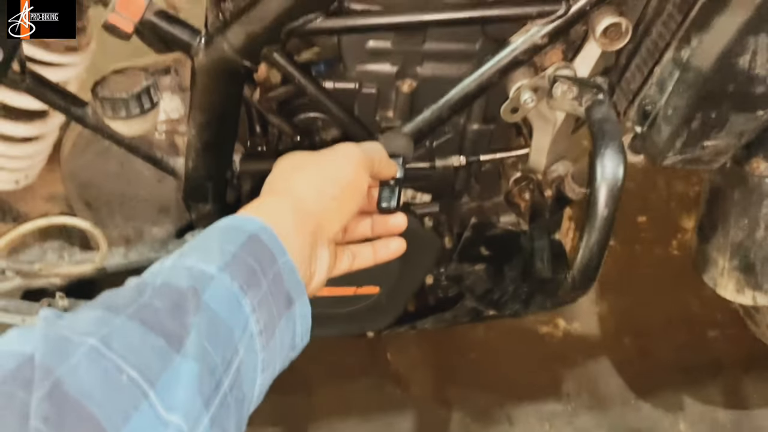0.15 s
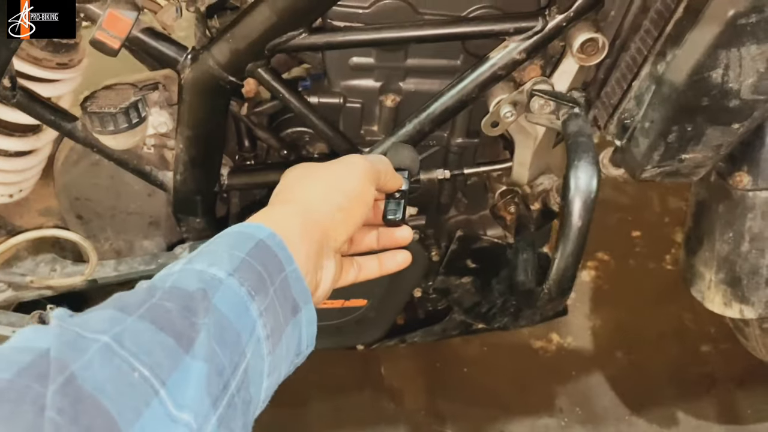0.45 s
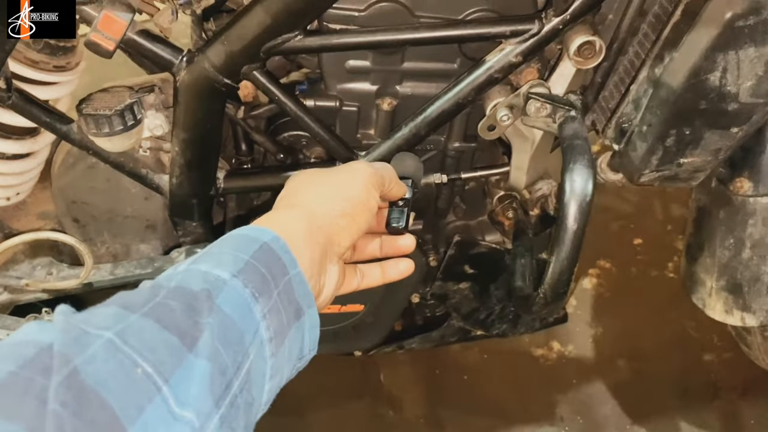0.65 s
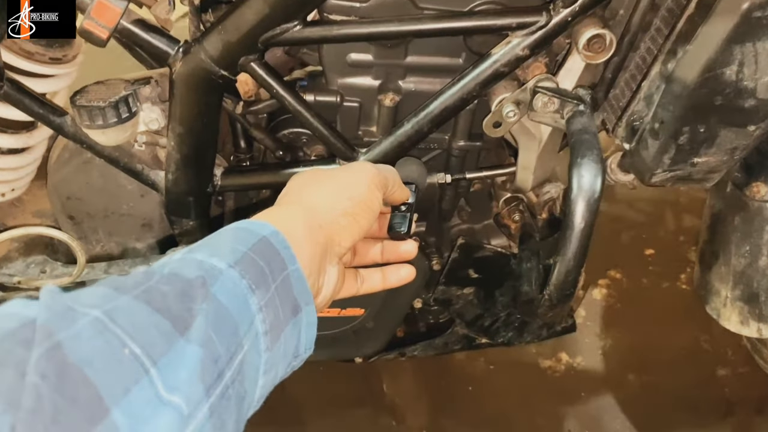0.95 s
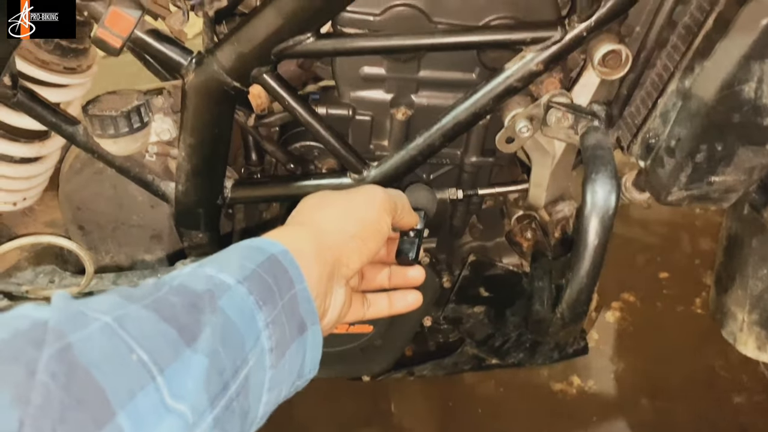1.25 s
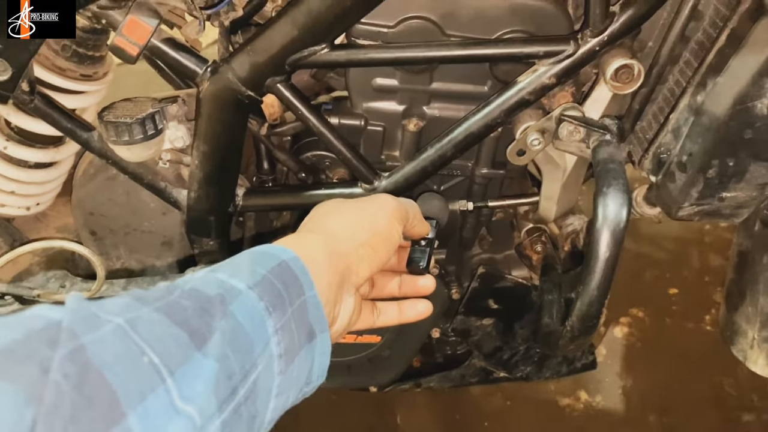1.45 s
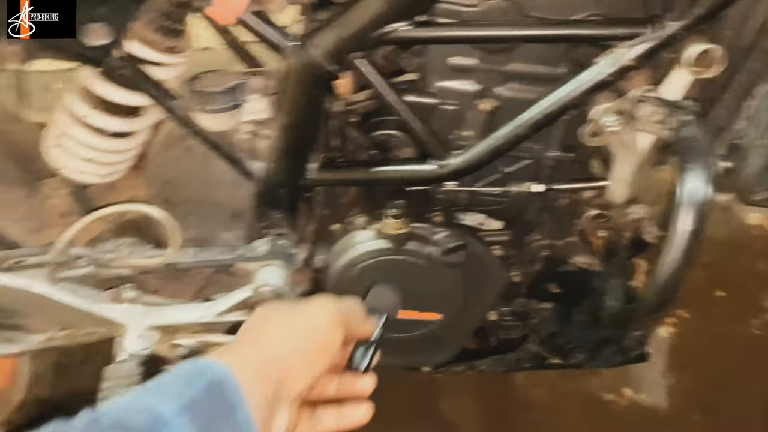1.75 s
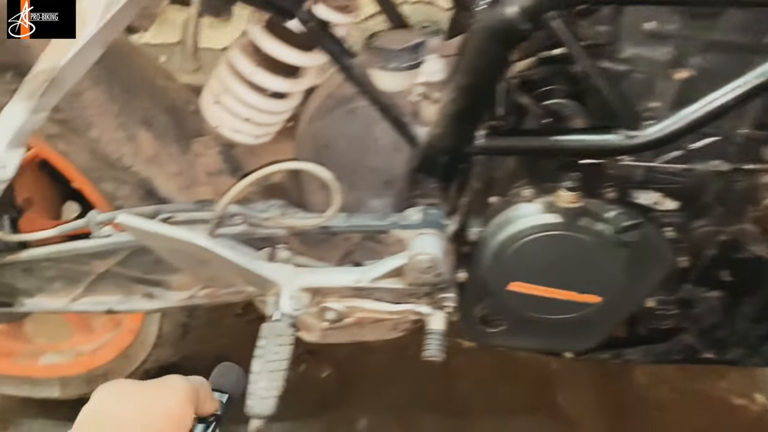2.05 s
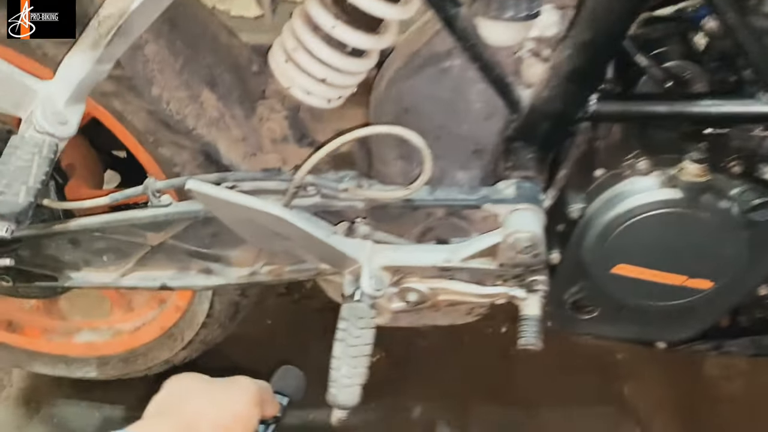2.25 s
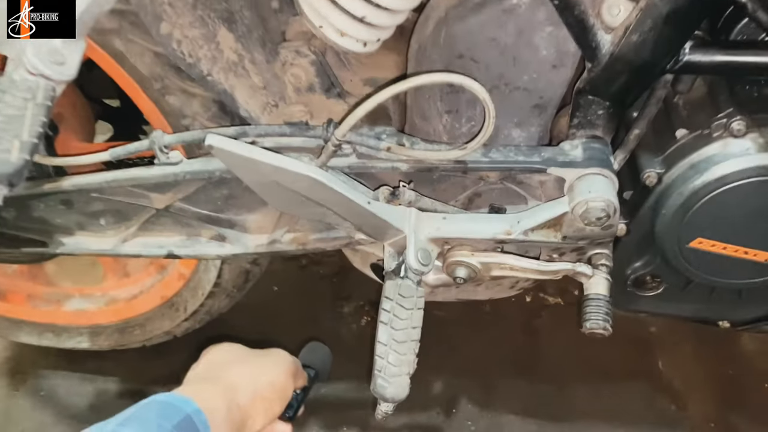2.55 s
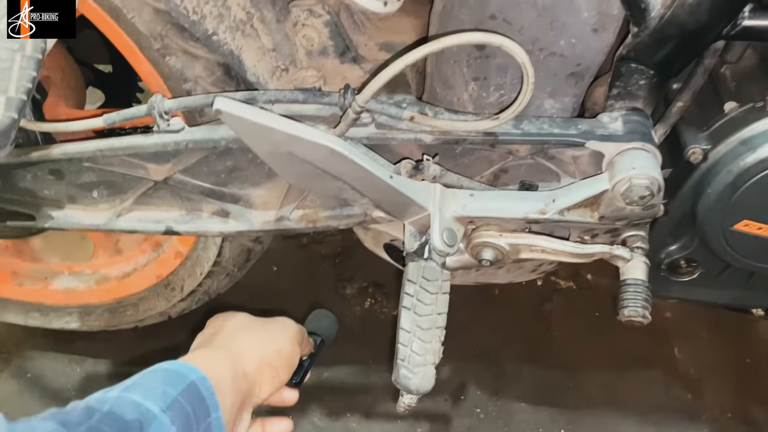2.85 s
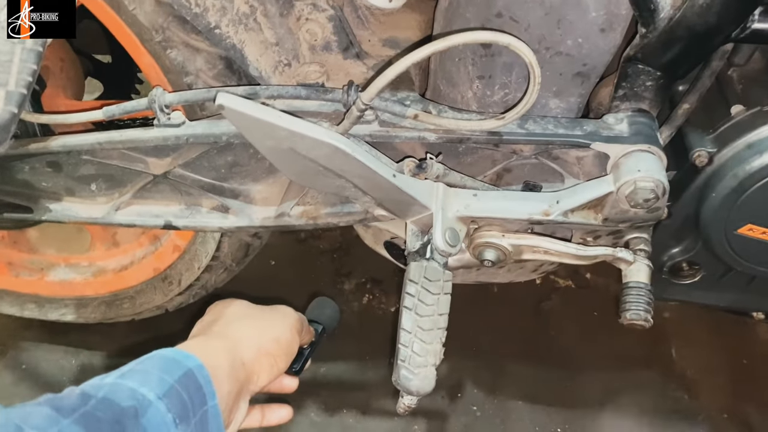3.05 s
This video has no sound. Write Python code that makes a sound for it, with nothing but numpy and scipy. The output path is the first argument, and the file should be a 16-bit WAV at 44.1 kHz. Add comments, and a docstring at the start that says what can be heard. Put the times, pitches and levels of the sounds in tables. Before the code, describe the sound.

Motorcycle single idling in a workshop, ticking valve gear first, then hollow exhaust thuds overloading the microphone

```python
"""In a workshop a single-cylinder motorcycle idles, about 14.6 firings a second, a small microphone at the case.
First come valve-gear clatter, tappet ticks and close case ringing, with a brief thin sizzle; the ringing fades.
As the microphone moves to the exhaust outlet, the tailpipe tones and a hollow bark rise: swelling, gliding sines.
Last, at the outlet, the gas puffs hit the microphone as low swings and bursts of noise, and overload it.
Silencer-box thumps and tones, a faint room tail and a low background run throughout."""
import sys
import numpy as np
from scipy import signal
from scipy.fft import rfft, irfft
from scipy.io import wavfile
from scipy.ndimage import uniform_filter1d

SR = 44100
rng = np.random.default_rng(int(sys.argv[2]) if len(sys.argv) > 2 else 0)


def materialize(psi):
    """Save the field psi as 16-bit PCM at rate SR to the path in sys.argv[1].

    A 1-D psi becomes a single channel; in a 2-D psi each row is a channel.
    """
    bounded = np.clip(np.atleast_2d(psi).T, -1, 1)
    quanta = np.round(bounded * 32767).astype(np.int16)
    wavfile.write(sys.argv[1], SR, quanta)


N = 141120
T = np.arange(N) / SR


def from_db(db):
    """Decibels to gain."""
    return 10 ** (np.asarray(db) / 20)


def rms_one(x):
    """Scale to unit rms."""
    return x / np.sqrt(np.mean(x ** 2) + 1e-20)


def level_curve(rows):
    """Gain over time, in straight lines between (t/s, level/dB) points."""
    return from_db(np.interp(T, *np.transpose(rows)))


def coloured_noise(spectrum):
    """Unit-rms noise coloured by (f/Hz, level/dB) points, joined on a log-frequency axis."""
    hz, db = np.transpose(spectrum)
    f = np.maximum(np.arange(N // 2 + 1) * SR / N, 1)
    gain = from_db(np.interp(np.log(f), np.log(hz), db))
    return rms_one(irfft(rfft(rng.standard_normal(N)) * gain, N))


def ring(drive, modes):
    """Damped modes (f/Hz, level/dB, t60/s) rung by one drive; unit rms."""
    out = 0
    for hz, db, t60 in modes:
        radius = from_db(-60 / (t60 * SR))
        angle = 2 * np.pi * hz / SR
        poles = [1, -2 * radius * np.cos(angle), radius * radius]
        mode = signal.lfilter([0, 1], poles, drive + 1e-18)
        out = out + from_db(db) * rms_one(mode)
    return rms_one(out)


def resonant_noise(resonances):
    """Noise sent twice through each resonance (f/Hz, width/Hz, level/dB); unit rms."""
    out = 0
    for hz, width, db in resonances:
        radius = np.exp(-np.pi * width / SR)
        section = [1, 0, -1, 1, -2 * radius * np.cos(2 * np.pi * hz / SR), radius * radius]
        band = signal.sosfilt([section, section], rng.standard_normal(N))
        out = out + from_db(db) * rms_one(band)
    return rms_one(out)


# the moments at which the cylinder fires: t/s
FIRING_TIMES = [0.012, 0.0824, 0.1536, 0.2213, 0.2916, 0.3614, 0.4316, 0.5022, 0.5737, 0.6438, 0.7106,
                0.7783, 0.8484, 0.9193, 0.9855, 1.0551, 1.1249, 1.1959, 1.2654, 1.3321, 1.3966, 1.4633,
                1.5311, 1.6014, 1.6707, 1.7413, 1.8064, 1.8735, 1.9421, 2.0119, 2.0788, 2.1469, 2.2147,
                2.283, 2.3514, 2.419, 2.4866, 2.5542, 2.6225, 2.6925, 2.7602, 2.8273, 2.897, 2.966, 3.0338,
                3.103, 3.173]


def bursts(rows, spread_db):
    """Envelope of bursts (delay/s, level/dB, attack/s, decay/s) in every cycle, each of its own strength."""
    out, age = np.zeros(N + SR), T[:SR // 10]
    for delay, db, attack, decay in rows:
        shape = np.minimum(age / attack, 1) * np.exp(-np.maximum(age - attack, 0) / decay)
        for s, chance in zip(FIRING_TIMES, rng.standard_normal(len(FIRING_TIMES))):
            start = max(int((s + delay) * SR), 0)
            out[start:start + len(age)] += from_db(db + spread_db * chance) * shape
    return out[:N]


VALVE_OPEN_S = 0.01877


def kicks(strengths, width_s, shut_share):
    """Rounded pressure kicks: one as the valve opens, an opposite one as it shuts."""
    out = np.zeros(N + SR)
    for s, strength in zip(FIRING_TIMES, strengths):
        out[int(s * SR)] -= strength
        out[int((s + VALVE_OPEN_S) * SR)] += strength * shut_share
    lag = np.arange(-256, 257) / SR
    return signal.fftconvolve(out[:N], np.exp(-(lag / width_s) ** 2), "same")


# hot gas lifts each tone from flat up to its pitch: share of the pitch, time constant in s
BEND_SHARE, BEND_S = 0.21, 0.0038


def blown(strengths, tones, pitch_spread, spread_db, bend_s=BEND_S):
    """Tones that swell with each rush of gas, glide up, hold and ring out; no two firings quite alike."""
    out, age = np.zeros(N + SR), T[:SR // 5]
    glide = age - BEND_SHARE * bend_s * (1 - np.exp(-age / bend_s))
    for hz, db, swell, hold, t60 in tones:
        shape = (1 - np.exp(-age / swell)) * from_db(-60 * np.maximum(age - hold, 0) / t60)
        shape = from_db(db) * rms_one(shape)
        chances = rng.standard_normal((len(FIRING_TIMES), 2))
        for s, strength, (detune, gain) in zip(FIRING_TIMES, strengths, chances):
            start = int(s * SR)
            pitch = hz * (1 + pitch_spread * detune)
            tone = shape * np.sin(2 * np.pi * pitch * glide)
            out[start:start + len(age)] -= strength * from_db(spread_db * gain) * tone
    return rms_one(out[:N])


# colour of the low background: f/Hz, level/dB
BACKGROUND_SPECTRUM = [(20, 2.5), (70, -8), (200, -11), (600, -3.5), (3000, -54)]
BACKGROUND_DB = -58.5


def background():
    """Steady noise, strongest in the deep bass."""
    return from_db(BACKGROUND_DB) * coloured_noise(BACKGROUND_SPECTRUM)


ROOM_T60_S, ROOM_DB = 0.35, -22


def workshop(x):
    """The room's faint, short diffuse tail: decaying noise convolved with the engine."""
    tail = rng.standard_normal(SR // 2) * from_db(-60 * T[:SR // 2] / ROOM_T60_S)
    tail = tail / np.sqrt(np.sum(tail ** 2))
    return from_db(ROOM_DB) * signal.fftconvolve(x, tail)[:N]


# shakes of the case in each cycle: delay/s, level/dB, attack/s, decay/s
CASE_BURSTS = [(.003, -2, 0.0016, 0.0027), (.018, -4.5, 0.0017, 0.0049), (.036, -38, .003, 0.0064),
               (.048, -2.5, 0.0016, 0.02)]
CASE_STEADY_DB = -3
# low, middle and high case resonances and a thin metallic sizzle: f/Hz, width/Hz, level/dB
CASE_LOW = [(1104, 38, -6.5), (1177, 75, -1.5), (1250, 91, -4.5), (1347, 66, -10)]
CASE_MID = [(1744, 157, 0)]
CASE_HIGH = [(2230, 140, -4), (2380, 204, -2.5), (2552, 170, -4.5), (3051, 110, -6.5), (3460, 260, -9.5)]
SIZZLE = [(7640, 500, 0)]
# level of each group at the microphone: t/s, level/dB
CASE_LOW_LEVEL = [(0, -34.5), (.3, -34.5), (.525, -34.5), (.555, -45), (.8, -51.5), (0.949, -45),
                  (1.25, -53.5), (1.45, -47.5), (1.798, -56), (2.199, -57.5), (3.2, -77.5)]
CASE_MID_LEVEL = [(0, -70), (.75, -59), (.95, -54), (1.118, -55.5), (1.28, -44), (1.5, -53.5), (1.68, -51),
                  (1.902, -62.5), (3.2, -56.5)]
CASE_HIGH_LEVEL = [(0, -31.5), (.1, -37), (.2, -40), (.43, -41.5), (.52, -51), (0.802, -52), (3.2, -67.5)]
SIZZLE_LEVEL = [(0, -74), (.14, -64), (.27, -57), (.42, -64), (0.598, -77), (3.2, -90)]


def engine_case():
    """Metal resonances shaken by the mechanism; which stand out depends on where the microphone is."""
    shake = rms_one(from_db(CASE_STEADY_DB) + bursts(CASE_BURSTS, spread_db=2.2))
    low = resonant_noise(CASE_LOW) * level_curve(CASE_LOW_LEVEL)
    middle = resonant_noise(CASE_MID) * level_curve(CASE_MID_LEVEL)
    high = resonant_noise(CASE_HIGH) * level_curve(CASE_HIGH_LEVEL)
    sizzle = resonant_noise(SIZZLE) * level_curve(SIZZLE_LEVEL)
    return shake * (low + middle + high + sizzle)


# valve gear contacts in each cycle: delay/s, level/dB, attack/s, decay/s
CONTACTS = [(.003, -6.5, 0.0014, .005), (.0135, -8.5, 0.00089, 0.0018), (.0195, -2.5, 0.00086, 0.0024),
            (.038, -18, .002, 0.0032), (.051, -6.5, 0.0011, 0.0019), (.0555, -15.5, 0.00056, 0.0021),
            (.064, -7, 0.00052, 0.0044)]
CONTACT_SPREAD_DB, WHIRR_DB, GRAIN_DB = 2.5, -3, 2.2
# colour of the clatter: f/Hz, level/dB
CLATTER_SPECTRUM = [(300, 2), (850, 1.5), (1250, 4), (1550, -2), (2000, 0.5), (2350, -3.5), (2800, -1.5),
                    (3650, -3), (4500, -4), (5200, -13.5), (6200, -10.5), (7200, -10), (8000, -15),
                    (8900, -12), (10300, -27), (15500, -59.5)]
# level of the clatter at the microphone, followed by the tappets too: t/s, level/dB
CLATTER_LEVEL = [(0, -46.5), (.7, -47.5), (1.4, -45.5), (1.8, -47.5), (2.1, -52), (2.5, -50.5),
                 (3.2, -49.5)]


def valve_gear():
    """Grainy contacts, noise bursts in a fixed order each cycle, over the whirr of chain and gears."""
    roughness = rms_one(uniform_filter1d(rng.standard_normal(N), size=50))
    grain = from_db(GRAIN_DB * roughness)
    envelope = from_db(WHIRR_DB) + bursts(CONTACTS, CONTACT_SPREAD_DB)
    clatter = rms_one(coloured_noise(CLATTER_SPECTRUM) * envelope * grain)
    return level_curve(CLATTER_LEVEL) * clatter


# sharp tappet ticks in each cycle: delay/s, level/dB
TICKS = [(0.014, 1.5), (0.0202, 0), (0.055, 3), (0.062, -1.5)]
# metal modes that the ticks ring: f/Hz, level/dB, t60/s
TICK_MODES = [(1293, 2.5, 0.028), (2160, -5.5, 0.013), (2653, -8, 0.038), (3010, -9.5, 0.011),
              (3658, 2, 0.028), (4240, -3, 0.024), (5830, -17, 0.036), (7240, -7.5, 0.036),
              (8880, -8, 0.03)]
# TICK_DB is relative to the clatter
TICK_DB, TICK_JITTER_S, TICK_SPREAD_DB, TICK_TOP_HZ = -7, 0.0008, 4, 9200


def tappets():
    """Single metal ticks; each strikes every mode with a strength of its own."""
    s, db = np.transpose([(fire + delay, db) for fire in FIRING_TIMES for delay, db in TICKS])
    at = ((s + TICK_JITTER_S * rng.standard_normal(len(s))) * SR).astype(int)
    out = 0
    for mode in TICK_MODES:
        strength = from_db(db + TICK_SPREAD_DB * rng.standard_normal(len(s)))
        clicks = np.zeros(N + SR)
        clicks[at] = strength * rng.choice([-1, 1], len(s))
        strikes = np.diff(clicks[:N], prepend=0)
        out = out + from_db(mode[1]) * ring(strikes, [mode])
    out = signal.sosfilt(signal.butter(6, TICK_TOP_HZ, fs=SR, output="sos"), out)
    return from_db(TICK_DB) * level_curve(CLATTER_LEVEL) * rms_one(out)


# low modes of the silencer box, thumped by the kicks: f/Hz, level/dB, t60/s
BOX_MODES = [(34, -16.5, 0.029), (73.4, 2.5, 0.42), (136, -4.5, 0.023), (193, 18.5, 0.023),
             (234, -6, 0.054)]
# THUMP_DB is relative to the box tones
KICK_WIDTH_S, BOX_SHUT_SHARE, THUMP_DB = 0.0012, 0.88, -3.5
# tones blown by the gas in box and tailpipe, and the pipe's hollow bark: f/Hz, level/dB, swell/s, hold/s, t60/s
BOX_TONES = [(359, 2.5, 0.0057, 0.014, 0.044), (361.2, -4, 0.0044, 0.085, 0.067),
             (75.5, -14, 0.014, 0.05, .15), (567, -21.5, .005, 0.029, 0.028), (697, -19, .005, 0.04, 0.13)]
PIPE_TONES = [(66.3, -9, 0.011, .02, 0.1), (137.8, 2, 0.0024, 0.012, 0.1), (253.5, -16, 0.0013, .012, 0.02),
              (358.7, -10, 0.0016, 0.019, 0.091), (407.5, -16, 0.0022, 0.019, 0.03)]
BARK_TONES = [(514, -8, 0.0014, 0.0054, 0.023), (571.4, -0.5, 0.0015, .016, 0.092),
              (673, -1, 0.0032, 0.023, 0.1)]
BARK_BEND_S = 0.0062  # the bark glides for longer
# levels of box, tailpipe and bark at the microphone: t/s, level/dB
BOX_LEVEL = [(0, -38), (1.8, -39.5), (2.4, -45.5), (3.2, -24)]
PIPE_LEVEL = [(0, -53.5), (1.62, -51.5), (1.83, -46.5), (1.96, -37.5), (2.1, -33), (2.37, -24.5),
              (2.51, -21), (2.65, -16), (2.8, -17), (3.2, -31)]
BARK_LEVEL = [(0, -64), (1.78, -65), (1.95, -48.5), (2.1, -45.5), (2.36, -38), (2.44, -39), (2.51, -32.5),
              (2.65, -27.5), (2.8, -27.5), (3.2, -29.5)]


def exhaust(strengths):
    """The firings thump the silencer box and blow its tones and those of the tailpipe."""
    valve_kicks = kicks(strengths, KICK_WIDTH_S, BOX_SHUT_SHARE)
    thump = from_db(THUMP_DB) * ring(valve_kicks, BOX_MODES)
    box = blown(strengths, BOX_TONES, pitch_spread=0.0093, spread_db=1.1)
    pipe = blown(strengths, PIPE_TONES, pitch_spread=0.0074, spread_db=1.05)
    bark = blown(strengths, BARK_TONES, pitch_spread=0.011, spread_db=2.2, bend_s=BARK_BEND_S)
    box_sound = level_curve(BOX_LEVEL) * (thump + box)
    return box_sound + level_curve(PIPE_LEVEL) * pipe + level_curve(BARK_LEVEL) * bark


# swings of the push on the microphone: f/Hz, level/dB, swell/s, hold/s, t60/s
PUFF_SWINGS = [(60.7, -4.5, 0.0039, 0.02, 0.05), (96.1, 2.5, .006, 0.024, 0.029),
               (224, -12, .006, 0.024, 0.12)]
# colour of the turbulence in each puff: f/Hz, level/dB
GUST_SPECTRUM = [(25, -27.5), (100, -4.5), (250, 1), (420, -14), (750, -13.5), (1200, -28.5), (2000, -42),
                 (4000, -58), (9000, -65.5), (16000, -61.5)]
# its burst in each cycle: delay/s, level/dB, attack/s, decay/s
GUST_BURST = [(.002, 0, 0.0083, 0.013)]
# levels of push and turbulence at the microphone: t/s, level/dB
PUFF_LEVEL = [(0, -70), (2.2, -46), (2.5, -30), (2.64, -19.5), (2.79, -16), (2.83, -10.5), (2.98, -7),
              (3.05, -11.5), (3.2, -5.5)]
GUST_LEVEL = [(0, -90), (2.25, -52), (2.48, -35.5), (2.66, -38), (2.77, -24), (2.84, -23.5), (2.91, -16.5),
              (3.05, -16), (3.12, -11), (3.2, -8.5)]


def puffs(strengths):
    """Each slug of gas pushes on the microphone and breaks into turbulence."""
    push = blown(strengths, PUFF_SWINGS, pitch_spread=0.1, spread_db=0.6)
    gust = rms_one(coloured_noise(GUST_SPECTRUM) * bursts(GUST_BURST, spread_db=0.1))
    return level_curve(PUFF_LEVEL) * push + level_curve(GUST_LEVEL) * gust


FIRING_SPREAD_DB = 0.24


def scene():
    """The engine in its workshop, the low background, and the puffs straight on the microphone."""
    strengths = from_db(FIRING_SPREAD_DB * rng.standard_normal(len(FIRING_TIMES)))
    engine = engine_case() + valve_gear() + tappets() + exhaust(strengths)
    mix = background() + workshop(engine) + engine + puffs(strengths)
    return mix[None]  # one channel


# OVERLOAD is the full-scale share at which the microphone saturates
OVERLOAD, COUPLING_HZ, CUTOFF_HZ = 0.66, 15, 15700


def record(dry):
    """The microphone overloads softly; the deepest bass and the top are cut."""
    clipped = OVERLOAD * np.tanh(dry / OVERLOAD)
    bass_cut = signal.butter(1, COUPLING_HZ, "high", fs=SR, output="sos")
    top_cut = signal.cheby2(12, 70, CUTOFF_HZ, fs=SR, output="sos")  # 70 dB down from the cutoff up
    return signal.sosfilt(top_cut, signal.sosfilt(bass_cut, clipped))


dry = scene()
out = record(dry)
materialize(out)
```